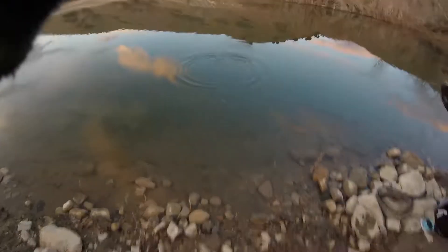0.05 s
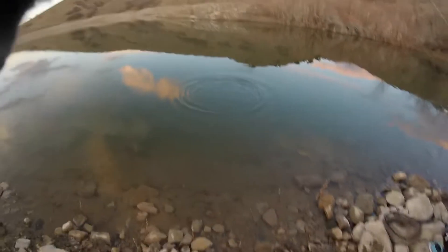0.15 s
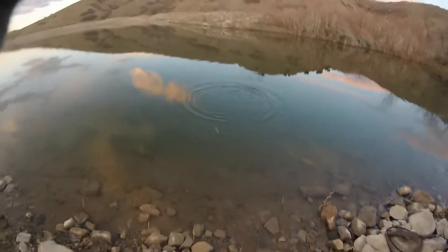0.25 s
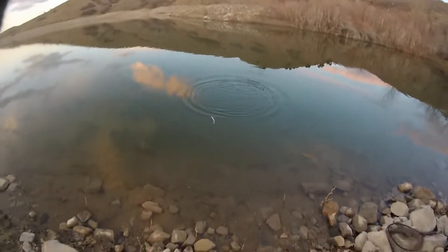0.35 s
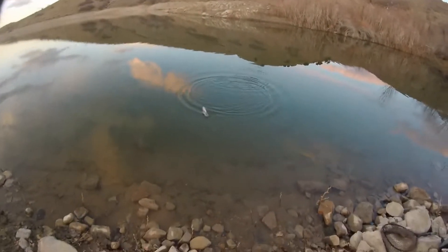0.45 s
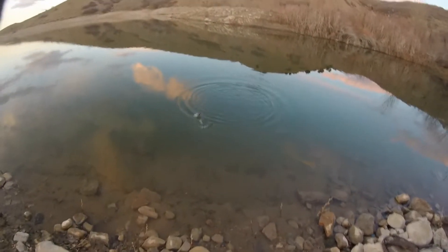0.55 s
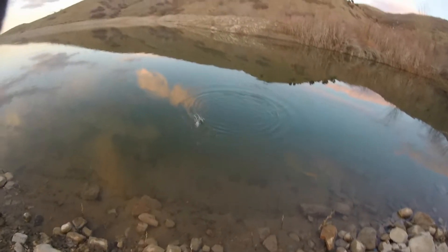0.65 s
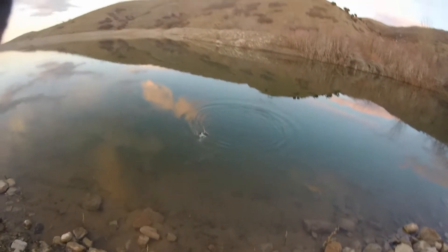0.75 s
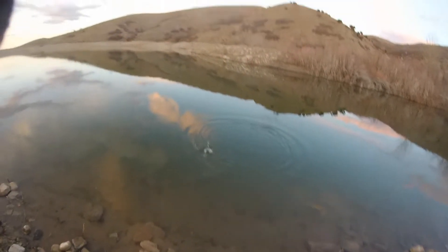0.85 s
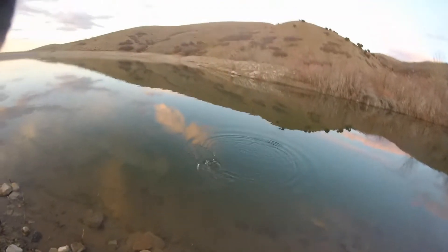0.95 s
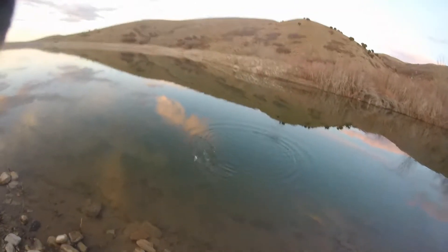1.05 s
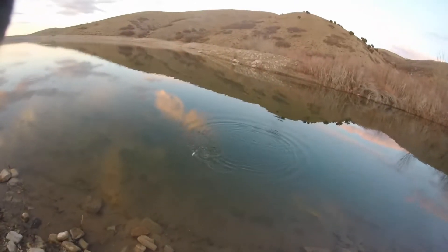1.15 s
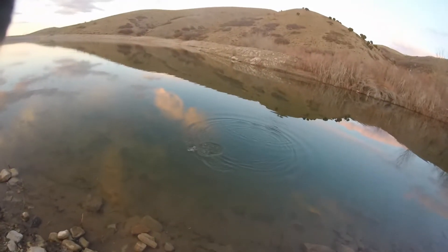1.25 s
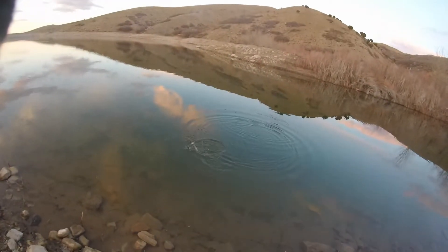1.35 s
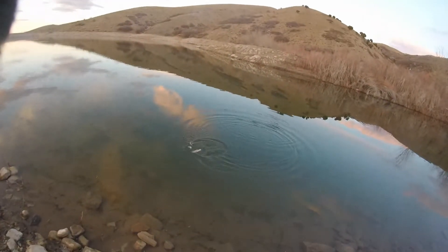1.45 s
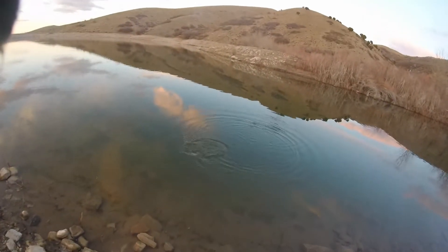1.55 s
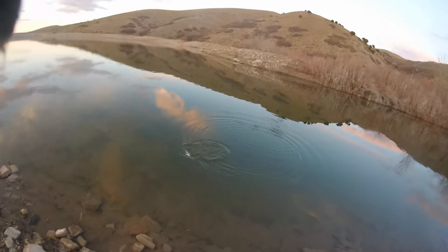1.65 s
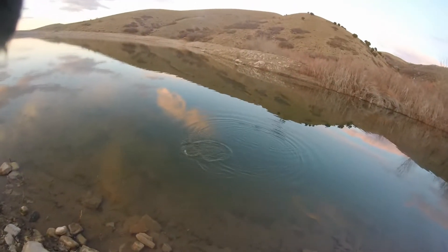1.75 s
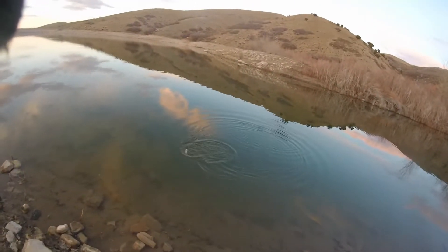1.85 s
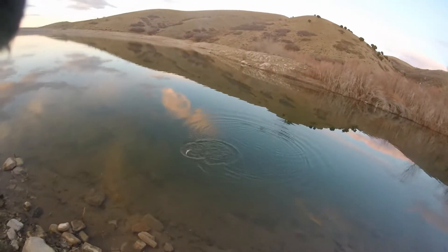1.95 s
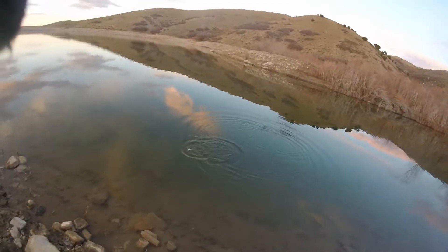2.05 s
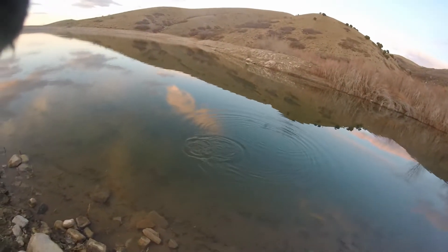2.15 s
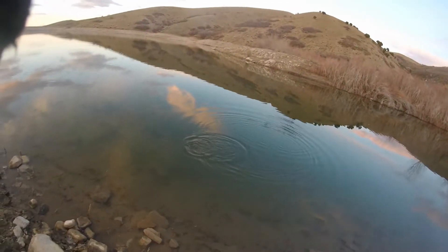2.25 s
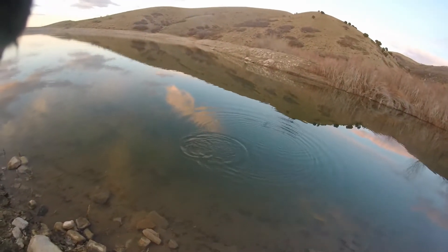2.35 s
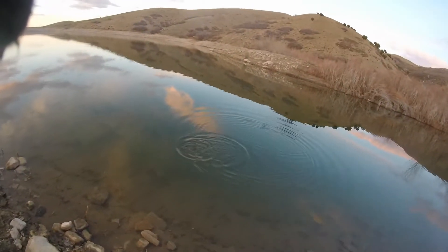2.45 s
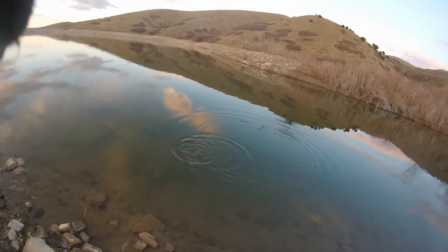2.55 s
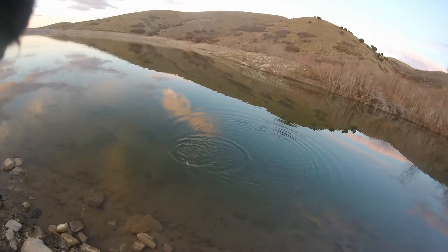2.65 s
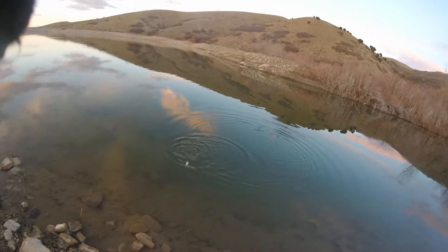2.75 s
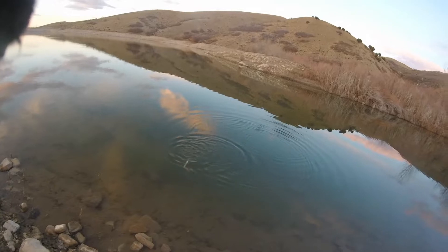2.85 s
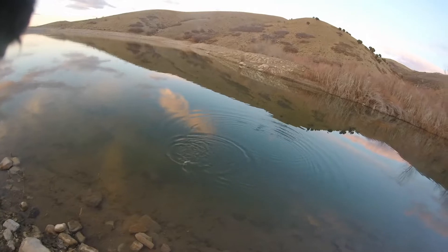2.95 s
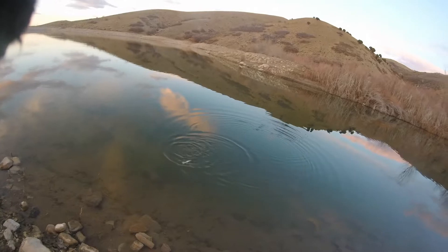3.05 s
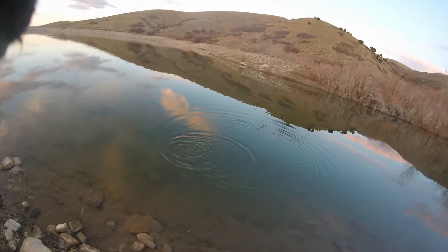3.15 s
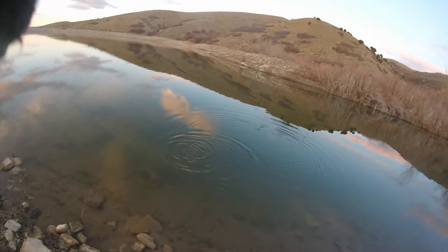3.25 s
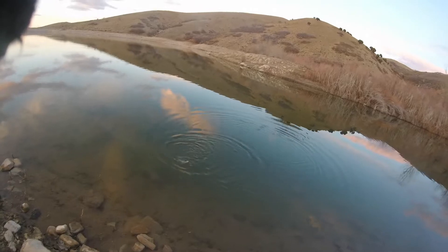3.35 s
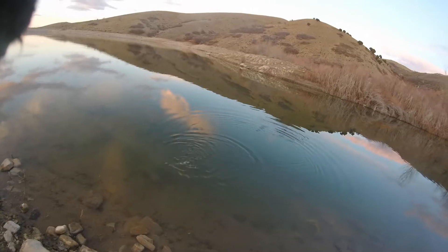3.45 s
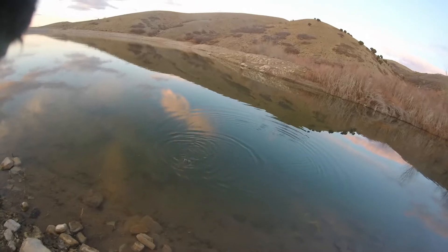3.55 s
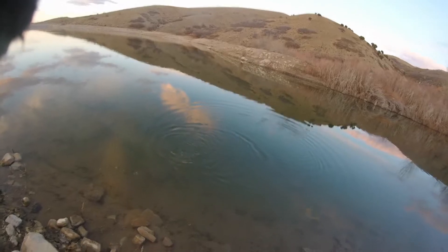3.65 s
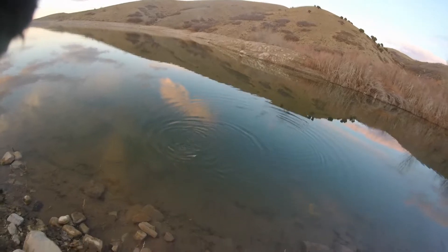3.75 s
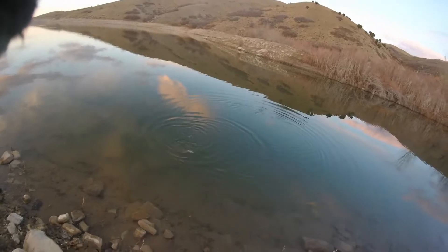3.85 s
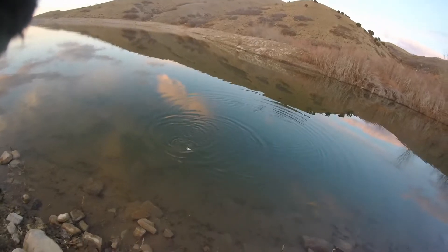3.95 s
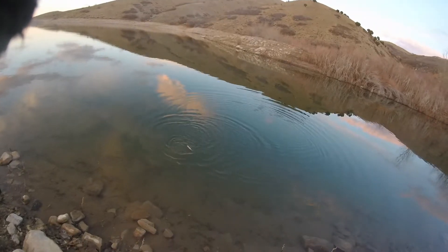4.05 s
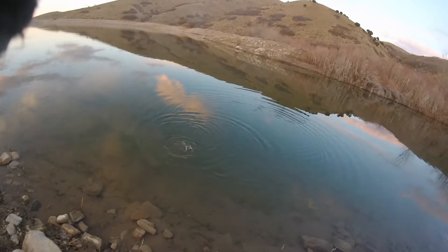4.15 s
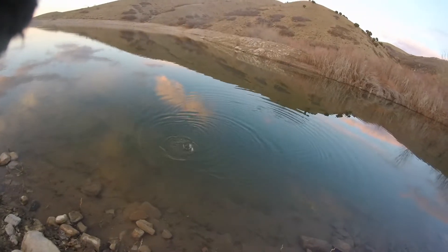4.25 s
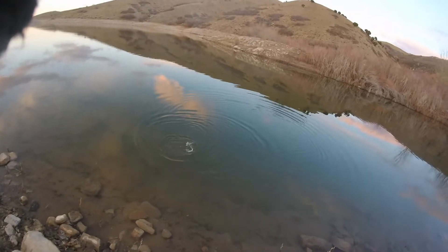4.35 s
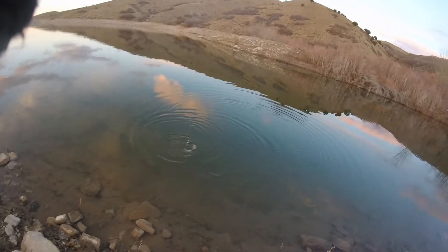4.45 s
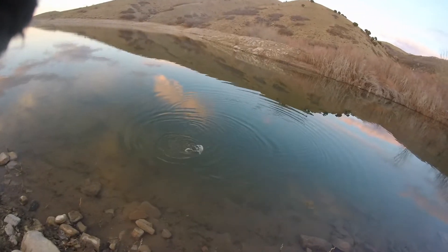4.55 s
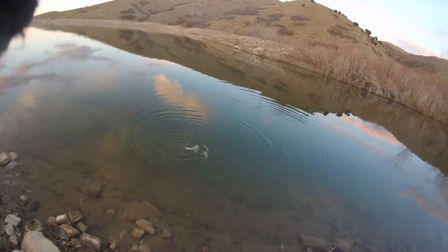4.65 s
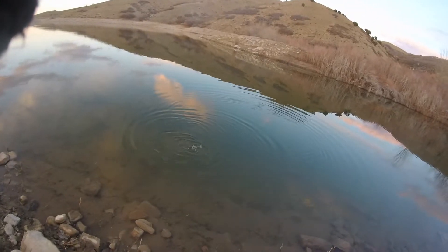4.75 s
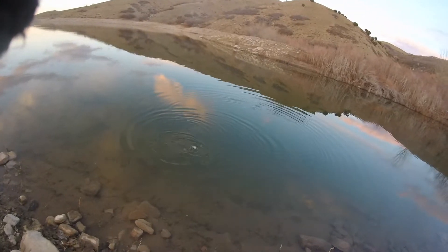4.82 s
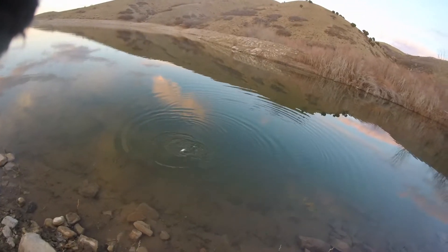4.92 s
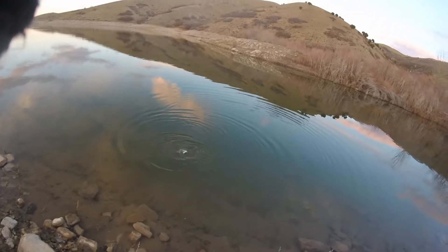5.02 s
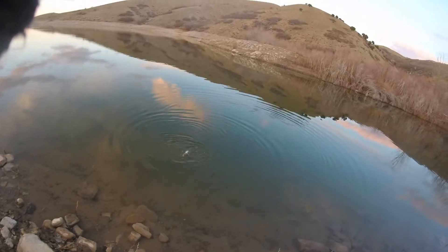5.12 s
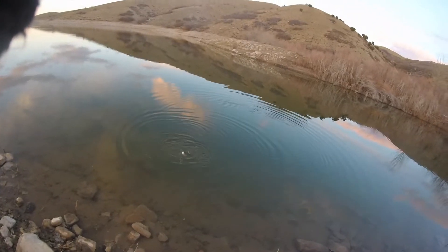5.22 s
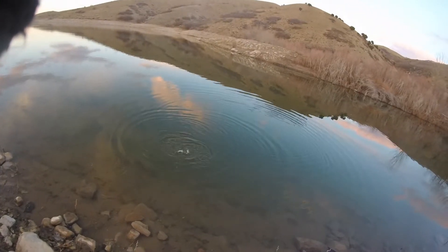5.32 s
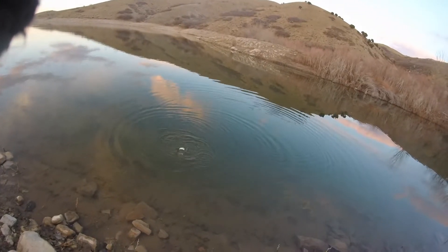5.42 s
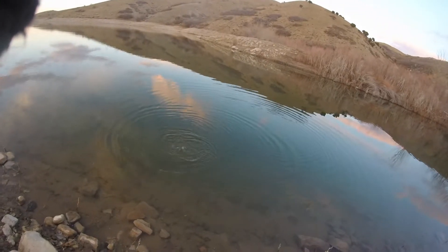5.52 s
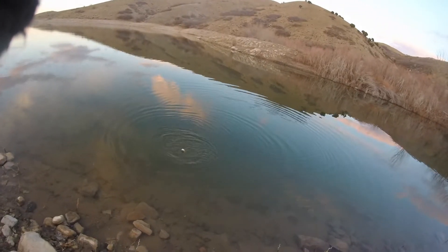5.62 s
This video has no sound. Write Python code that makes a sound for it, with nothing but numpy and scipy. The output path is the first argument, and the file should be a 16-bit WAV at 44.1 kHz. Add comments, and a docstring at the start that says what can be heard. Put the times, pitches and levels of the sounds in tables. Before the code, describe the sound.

A reel snaps and line swishes past up close, then a small rig plops, gulps and ticks in quiet still water.

```python
"""Rod and reel beside still water

Close by, a rod is swung at a reservoir's edge: the reel snaps, line and sleeve swish past, the reel clacks
three times. Out on the water a small rig flips about: bubbles plop and gulp, droplets tick.
Air and churned water are shaped noise and grains; metal and bubbles are dying sines; ticks ring a housing.
A quiet wide outdoor hush lies behind. One microphone feeds both channels.
"""
import sys
import numpy as np
from scipy import signal
from scipy.fft import rfft, irfft, next_fast_len
from scipy.io import wavfile
from scipy.ndimage import uniform_filter1d

SR = 44100
rng = np.random.default_rng(int(sys.argv[2]) if len(sys.argv) > 2 else 0)


def int16_out(signal):
    """Quantize to a 16-bit WAV file."""
    q = np.round(np.clip(np.atleast_2d(signal).T, -1, 1) * 32767)
    wavfile.write(sys.argv[1], SR, q.astype(np.int16))


N = 250563

# The swing, level before flutter: (time [s], bass swish [dB], middle swish [dB], high swish [dB])
SWING = [(0, -27, -23, -40), (.01, -29.5, -27.5, -46), (.021, -38, -36.5, -49), (.03, -41, -38.5, -43),
         (.05, -43, -38.5, -42), (.065, -46, -37, -38), (.094, -43.5, -36.5, -36.5), (.13, -42, -36, -38.5),
         (.162, -42.5, -35, -38.5), (.178, -48, -39, -43.5), (.2, -50, -43.5, -50), (.213, -40, -42.5, -51),
         (.235, -44.5, -42.5, -52.5), (.27, -46, -43.5, -49), (.3, -46, -40.5, -53.5),
         (.335, -45, -45, -53.5), (.36, -51, -45, -58), (.385, -71, -53, -67), (.42, -59, -65, -69),
         (.47, -66, -58.5, -69), (.6, -75, -59, -65), (.66, -70, -62, -71), (.75, -59, -82, -75),
         (.95, -70, -68, -92)]
# Topmost range of the swish, level before flutter: (time [s], level [dB])
SWING_TOP = [(0, -46), (.012, -48), (.025, -56), (.066, -58), (.1, -53), (.14, -50), (.17, -54), (.19, -60),
             (.23, -63), (.28, -66), (.33, -69), (.37, -76), (.42, -82), (.5, -88)]
# Colour of the torn air: (frequency [Hz], relative density [dB per Hz])
SWISH_SPECTRUM = [(70, -13), (200, -11.5), (330, -15), (520, -8.5), (700, -3.5), (1100, -9), (1430, -3.5),
                  (1680, -6.5), (1930, -3), (2200, -9.5), (2450, -15), (2900, -19), (3300, -13),
                  (3620, -11), (4200, -10), (5300, -8), (7100, -14), (7700, -11.5), (8600, -20.5),
                  (10500, -25), (10950, -24), (11400, -13), (15200, -30)]
BASS_SPLIT_HZ, HIGH_SPLIT_HZ, TOP_SPLIT_HZ = 1100, 3400, 9700
WHIRLS_PER_S, WHIRL_SHARE, WHIRL_CYCLES = 430, 0.51, 14  # gurgling grain of the low swish
SPRAY_PER_S, SPRAY_SHARE = 830, 0.2  # crackling grain of the high swish

# The bail wire snaps over and bounces: (time [s], level of the ring [dB])
BAIL_SNAPS = [(0.0051, -12.5), (0.0074, -20), (.0152, -28)]
# Modes of the bail wire: (frequency [Hz], relative level [dB], t60 [s])
BAIL_MODES = [(1440, -0.5, 0.013), (2700, -10, 0.0058), (3250, 3.5, 0.0034), (4800, -4, 0.0067),
              (7850, -5, 0.002)]

# Blows on the reel: (time [s], peak of the ring [dB], hardness [dB per octave])
REEL_BLOWS = [(1.0172, -45, 3), (1.0199, -28, -1.5), (1.0445, -28.5, 0.7), (1.0766, -30.5, 1.5),
              (1.0847, -37, -2)]
# Modes of the reel, before chance detuning: (frequency [Hz], relative level [dB], t60 [s])
REEL_MODES = [(298, -6, 0.026), (594, 2, 0.042), (410, 1, 0.011), (527, 8, 0.026), (748, 1.5, 0.13),
              (910, -6, 0.11), (1160, 0, 0.027), (1376, 5, 0.032), (1935, -5, 0.031), (2150, -11, 0.045),
              (3080, 2, 0.0085), (5100, -25, .012), (7600, -20, 0.0072)]
REEL_LOOSENESS = 0.025  # spread of each mode's shift from blow to blow, as a share
CRACK_DB = -9  # crack against the ring
THUD_HZ, THUD_WIDTH_HZ, THUD_DB, THUD_T60_S = 560, 380, -15, 0.09  # loose parts rattling low
# The spool rubs and sings around the clacks: (time [s], rms level [dB])
SPOOL_RUB = [(0.947, -73), (.957, -48), (.97, -57), (.983, -49), (.996, -46), (1.001, -59), (1.012, -51),
             (1.058, -57), (1.068, -41), (1.074, -58), (1.08, -44), (1.093, -50), (1.1, -72)]
RUB_HZ, RUB_WIDTH_HZ = 915, 45
RUB_ROUGH, RUB_WAVER_HZ = 1, 25.2  # noise beside the tone; unsteadiness of its pitch

# Bubbles: (time [s], approximate peak [dB], middle of the pitch rise [Hz], t60 [s])
PLOPS = [(0.2209, -24.5, 670, 0.0055), (0.2875, -36, 1840, .008), (0.2899, -27, 785, 0.0092),
         (0.292, -29, 1580, .008), (0.379, -26.5, 764, 0.0041), (0.397, -30, 810, 0.0058),
         (0.412, -34, 880, 0.017), (0.42, -36, 920, 0.014), (0.43, -37, 940, 0.023),
         (0.4783, -31.5, 694, 0.012), (0.494, -32, 746, 0.0037), (0.4976, -32, 804, 0.006),
         (0.5124, -35, 830, 0.015), (0.526, -45, 2020, 0.0046), (0.5417, -41, 910, 0.012),
         (0.5458, -38.5, 5200, 0.0047), (0.55, -46, 2930, 0.02), (0.561, -37.5, 1020, 0.0096),
         (0.553, -42, 1590, 0.0077), (0.5937, -44, 1010, 0.045), (0.6108, -43, 855, 0.011),
         (0.634, -36.5, 1440, 0.025), (0.671, -45, 1230, 0.021), (0.6777, -45, 4650, 0.018),
         (0.6781, -36, 875, 0.027), (0.69, -45, 810, .014), (0.7162, -37.5, 1068, 0.01),
         (0.728, -48, 1280, 0.06), (0.744, -37, 1280, 0.0088), (0.748, -41.5, 1250, 0.016),
         (0.78, -44, 1210, 0.011), (0.904, -51, 1968, 0.0073), (1.169, -45.5, 900, 0.031),
         (1.178, -46, 817, 0.0075), (1.229, -50, 720, .01), (1.238, -48, 780, 0.014),
         (1.274, -45, 1760, 0.006), (1.277, -48, 2470, .012), (1.3395, -49, 805, .008),
         (1.3426, -45.5, 2280, 0.011), (1.351, -51, 2230, 0.013), (1.369, -51, 2400, .01),
         (1.382, -44, 2340, 0.02), (1.395, -51, 2270, 0.023), (1.4273, -43, 2100, 0.0065),
         (1.4948, -43.5, 710, 0.012), (1.517, -52, 1950, 0.0069), (3.3861, -52, 1380, .02),
         (3.408, -44, 1854, 0.0068), (3.421, -49, 3320, 0.0071), (3.432, -58, 4800, .025),
         (3.4432, -50, 2100, .013), (3.4977, -52, 2437, .005), (3.521, -42.5, 750, 0.019),
         (4.1485, -46.5, 1400, 0.013), (4.1567, -44.5, 2970, 0.0098), (4.2062, -44, 2750, 0.0067),
         (4.206, -41, 905, 0.0081), (4.225, -52, 1750, .012), (4.276, -48, 1420, 0.011),
         (4.2878, -35.5, 2050, 0.0064), (4.2905, -44, 950, .012), (4.291, -42, 2000, .008),
         (4.313, -52, 3020, .008), (4.353, -52, 1500, .012), (4.474, -35.5, 1070, 0.025),
         (4.494, -32.5, 1310, 0.01), (4.5, -43.5, 1780, 0.019), (4.523, -42.5, 1200, 0.017),
         (4.528, -48.5, 445, 0.064), (4.5732, -40, 2520, 0.0062), (4.6635, -50, 2928, .004),
         (4.6937, -33, 6890, 0.013), (4.694, -58, 13100, 0.026), (4.7164, -41.5, 790, 0.011),
         (4.7266, -36, 780, 0.024), (4.733, -52, 2900, .008), (4.746, -52, 3030, .01),
         (4.738, -57, 4500, .02), (4.7482, -45, 2250, 0.003), (4.7756, -38.5, 1060, 0.004),
         (4.8153, -42.5, 1630, 0.016), (4.8213, -42, 386, 0.039), (5.2522, -36.5, 1760, 0.012),
         (5.2602, -27.5, 2630, 0.0019), (5.3691, -44, 1300, 0.018), (5.37, -45, 3020, 0.019),
         (5.378, -43, 1290, 0.0099), (5.392, -54, 3080, .025)]
PLOP_ATTACK_S, ATTACK_BY_SIZE = 0.0013, 0.77  # 1 kHz bubble of 12 cycles; power of bubble size
ATTACK_BY_RING = 0.58  # bubbles that ring more cycles also swell more slowly, by this power
PLOP_RISE_OCTAVES, PLOP_SPLASH = 0.15, 0.073  # at 1 kHz; both shrink for small, high bubbles
LANDING_SPLASH, LANDING_S = 3, 0.74  # extra splash just after the landing; its time constant
BLIP = 2000  # samples in the longest bubble
# Air pockets closing while they rise or sink: (time [s], length [s], start pitch [Hz], end pitch [Hz],
# level before wetness [dB], power of the pitch glide [1], share of length spent swelling [1])
GULPS = [(.556, .014, 1600, 950, -47, 1.1, .3), (0.732, 0.034, 369, 417, -47, 1.2, 0.66),
         (1.168, 0.0154, 1450, 2050, -56, 1.1, .3), (1.327, .008, 900, 1300, -50, 1.1, .4),
         (1.3442, 0.013, 1090, 1870, -41.5, 1.34, 0.32), (1.387, 0.0099, 890, 1260, -48, 1.1, .3),
         (1.429, .007, 1750, 2150, -53, 1.2, .3), (2.0882, .012, 1310, 1020, -44, 1.3, .08),
         (2.108, 0.023, 708, 1700, -43, 2.24, 0.12), (3.406, 0.009, 665, 676, -46, 1.1, .3),
         (3.418, 0.0126, 677, 697, -39, 0.97, .55), (4.4124, 0.034, 601, 850, -44, 1.03, .06),
         (4.425, 0.014, 750, 1970, -40.5, 1.06, 0.81), (4.595, 0.015, 680, 2170, -51.5, 0.94, 1)]
GULP_ONSET, GULP_SAG = 0.79, 0.42  # strength 0-1 at the start and just before the end
GULP_WOBBLE, GULP_WET = 0.05, 0.2  # unsteadiness of pitch and of strength, as shares
# Small splashing between the plops, before each user's share: (time [s], density [bubbles per s])
STIR = [(0, 150), (.5, 330), (1.0, 70), (1.5, 70), (1.8, 15), (2.4, 5), (3.2, 3), (3.45, 60), (3.7, 3),
        (4.05, 5), (4.3, 90), (4.8, 100), (5.3, 70), (5.68, 15)]
STIR_DB, STIR_SPREAD_DB = -57.5, 10  # smallest draw at the lowest pitch; range of chance above it

# Swarms of tiny bubbles: (time [s], length [s], centre frequency [Hz], rms level over length [dB])
SPATTER = [(0.371, 0.026, 897, -49), (0.438, 0.015, 1180, -46.5), (0.537, 0.027, 1860, -51),
           (0.57, 0.032, 2360, -66), (0.583, 0.027, 1600, -54), (0.694, 0.042, 1300, -62),
           (0.628, 0.022, 1440, -48.5), (0.658, 0.067, 1100, -66), (0.739, 0.017, 1540, -57),
           (0.765, .013, 1370, -56), (0.905, 0.015, 1370, -51.5), (1.167, 0.024, 1000, -65),
           (1.23, 0.013, 1710, -66), (1.335, 0.02, 1410, -52.5), (3.408, 0.012, 1500, -56.5),
           (3.431, 0.019, 1100, -55), (3.484, 0.049, 785, -58.5), (4.294, 0.018, 803, -58),
           (4.47, 0.021, 1660, -66), (4.572, 0.0085, 2700, -56), (4.846, 0.01, 2880, -60),
           (5.013, 0.011, 2870, -56), (5.259, 0.011, 2400, -51.5), (5.352, 0.0063, 2300, -55),
           (5.368, 0.018, 2060, -52.5)]
SPATTER_SPREAD_OCTAVES = 0.59
# Droplets slapping the surface, broad and very short: (time [s], peak [dB], centre frequency [Hz])
SLAPS = [(.1615, -27, 1900), (.212, -32, 1900), (.2268, -30, 1300), (.2465, -36, 1600), (.2755, -34, 1200),
         (.2888, -31, 3000), (.319, -35, 2200), (.3973, -43, 2200), (0.413, -44, 2000), (.4308, -41, 1900),
         (.4485, -52, 2300), (.4787, -44, 1900), (.4985, -41, 2200), (.5425, -44, 2600), (.5525, -48, 1700),
         (.596, -52, 2800), (0.645, -46, 2000), (.7165, -52, 1500), (.743, -36.5, 1700),
         (0.7498, -40.5, 2100), (0.7538, -42, 1600), (1.346, -45, 1600), (1.381, -49, 2000),
         (2.089, -50, 2500), (2.2142, -49, 3000), (3.4073, -50, 1300), (3.4325, -47, 1400),
         (4.415, -51, 2600), (4.475, -55, 1600), (4.691, -48, 1900), (4.717, -50, 1500), (4.777, -53, 1300),
         (5.3495, -50, 2600), (5.3685, -49, 2000), (5.376, -46, 1600)]
SLAP_T60_S, SLAP_WIDTH = 0.0055, 0.9  # width as a share of the centre frequency
# Churned water around the splashes: (time [s], rms level [dB])
WASH = [(0, -47), (.1, -46), (.2, -51.5), (.3, -52), (.37, -58), (.45, -62), (.47, -68), (.55, -57),
        (.65, -60.5), (.75, -66), (.85, -73), (1.0, -62), (1.4, -72), (1.6, -79), (2.06, -76), (2.11, -62),
        (2.25, -77), (3.36, -73), (3.43, -63), (3.53, -64), (3.62, -73), (4.1, -83), (4.2, -66),
        (4.45, -66), (4.6, -67.5), (4.75, -61), (4.9, -69), (5.3, -66), (5.5, -80)]
WASH_PER_S, WASH_CYCLES, WASH_TILT_DB = 1200, 7.3, -3  # typical grain rate; level per octave

# Droplet and line ticks: (time [s], loudest 1 ms rms [dB], centre frequency [Hz], t60 of the puff [s])
TICKS = [(0.207, -46, 11100, 0.016), (0.288, -46, 11300, 0.0093), (0.289, -43, 7000, .005),
         (0.363, -40, 7000, 0.0051), (0.385, -49, 5000, 0.017), (0.4305, -51, 5300, 0.014),
         (0.449, -52, 7934, .009), (0.478, -43, 4500, 0.0073), (0.498, -56, 5197, 0.014),
         (0.5195, -55.5, 10700, 0.03), (0.5458, -66, 6050, .015), (0.5799, -60, 7843, .048),
         (0.633, -57, 8700, 0.042), (0.6783, -53, 5130, .023), (0.7057, -54.5, 6500, .046),
         (0.7134, -67, 10018, .025), (0.7336, -55, 6300, 0.051), (0.7473, -55.5, 8700, 0.034),
         (0.779, -59, 9195, 0.015), (0.9037, -58, 6800, 0.031), (1.164, -50, 6750, 0.0082),
         (1.2296, -59, 4553, .01), (1.2737, -50, 7850, 0.016), (1.3494, -60, 7440, 0.042),
         (1.386, -59, 5500, 0.059), (1.433, -58.5, 6740, 0.013), (1.5188, -58, 5578, 0.009),
         (1.5622, -53.5, 7700, 0.011), (2.108, -60, 4792, 0.011), (2.213, -61, 5900, 0.0085),
         (3.298, -57, 9550, 0.0018), (3.3335, -57, 5100, 0.016), (3.4207, -56, 4530, .025),
         (4.122, -57, 8250, 0.03), (4.157, -56, 4907, 0.029), (4.2062, -56, 7851, 0.035),
         (4.295, -58, 9285, 0.017), (4.3248, -58, 5600, 0.025), (4.399, -65, 7600, .014),
         (4.415, -57.5, 4800, .035), (4.432, -58, 6300, .019), (4.553, -67, 6200, .012),
         (4.572, -61, 7596, 0.028), (4.5864, -59, 8754, .018), (4.6459, -64, 10000, .02),
         (4.6946, -57, 7140, 0.046), (4.693, -55, 13200, 0.011), (4.731, -62, 8450, .042),
         (4.802, -69, 6800, .025), (4.821, -59, 8219, .023), (4.906, -57, 6200, 0.014),
         (4.9932, -58, 5738, .016), (5.0182, -50, 10000, 0.033), (5.0844, -62, 9205, 0.013),
         (5.133, -65, 9000, .014), (5.1702, -57, 9200, 0.061), (5.1778, -54.5, 7950, 0.018),
         (5.253, -51.5, 11600, 0.012), (5.2614, -50, 8500, 0.022), (5.3683, -52.5, 7040, .025),
         (5.378, -66, 11500, .014), (5.426, -61, 8100, .014), (5.4519, -61, 7400, .024),
         (5.4954, -62, 8218, .016)]
# Housing a tick rings in: (frequency [Hz], nominal width, widened in use [Hz], relative level [dB])
HOUSING = [(3550, 1400, 37), (4650, 480, 26), (6090, 2500, 2.5), (7700, 1000, -10.5), (8780, 220, -10),
           (11100, 370, -19.5), (13700, 1500, -20.5)]
TICK_SPREAD_OCTAVES = 0.27
PATTER_CALM_PER_S = 30  # no patter while fewer bubbles come
PATTER_SHARE, PATTER_DB, PATTER_T60_S = 0.1, -68, 0.018  # level is that of the faintest draw

# Colour of the hush: (frequency [Hz], relative density [dB per Hz])
HUSH_SPECTRUM = [(12, -19), (25, 0.5), (62, 2.5), (85, 0.5), (120, 1.5), (175, -1.5), (240, 0.5), (390, -4),
                 (690, -5.5), (1080, -12.5), (1780, -12.5), (2760, -18.5), (4800, -24), (9600, -31.5),
                 (15200, -42.5)]
# The hush swells a little: (time [s], lift above HUSH_DB [dB])
HUSH_SWELL = [(0, 2.5), (.8, 3), (1.5, 1.6), (2.2, 1.94), (3.5, 1.33), (5, 1.9), (5.68, 1.5)]
HUSH_DB = -57
# Faint fizz of bursting foam, before its flicker: (time [s], rms level [dB])
FIZZ = [(0, -87), (1.9, -89), (2.12, -75.5), (2.35, -86), (2.6, -100), (4.4, -89), (4.58, -79), (4.67, -73),
        (4.75, -86), (4.9, -78), (5.68, -95)]
FIZZ_HZ, FIZZ_WIDTH_HZ = 10000, 13000
CUTOFF_HZ = 15600


def swish():
    """Air torn by rod and line: fluttering noise in four ranges, gurgling below, crackling above."""
    bass_db, middle_db, high_db = in_time(SWING, after=-120)
    top_db, = in_time(SWING_TOP, after=-120)
    air = coloured(SWISH_SPECTRUM)
    low = rms_one(split(air, 4, HIGH_SPLIT_HZ, "low")) + WHIRL_SHARE * rms_one(whirls())
    bass = split(low, 3, BASS_SPLIT_HZ, "low")
    middle = split(low, 3, BASS_SPLIT_HZ, "high")
    spray = rng.exponential(1, N) * (rng.random(N) < SPRAY_PER_S / SR)
    crackle = rms_one(uniform_filter1d(spray, size=12))
    bright = split(air * (1 + SPRAY_SHARE * crackle), 4, HIGH_SPLIT_HZ, "high")
    top = split(bright, 4, TOP_SPLIT_HZ, "high")
    high = split(bright, 4, TOP_SPLIT_HZ, "low")
    flutter_db = 0.89 * drift(340)  # shared by bass and middle
    out = rms_one(bass) * from_db(bass_db + 1.0 * drift(36) + flutter_db)
    out += rms_one(middle) * from_db(middle_db + 0.34 * drift(60) + flutter_db)
    out += rms_one(high) * from_db(high_db + 0.55 * drift(90))
    return out + rms_one(top) * from_db(top_db + 0.6 * drift(70))


def whirls():
    """Uneven short rings scattered over the low swish's pitches give it a gurgling grain."""
    kicks = random_kicks(1.4, WHIRLS_PER_S)
    dealt = rng.integers(0, 12, N)  # the pitch each kick falls to
    spectrum_hz, spectrum_db = np.transpose(SWISH_SPECTRUM)
    out = np.zeros(N)
    for k, hz in enumerate(np.geomspace(520, 2300, num=12)):
        ring = resonate(kicks * (dealt == k) + 1e-18, hz, 1.8 * hz / WHIRL_CYCLES)
        out += from_db(np.interp(hz, spectrum_hz, spectrum_db)) * resonate(ring, hz, hz / 2)
    return out


def bail():
    """Each snap rings the short bright modes of the wire."""
    out = np.zeros(N)
    for s, snap_db in BAIL_SNAPS:
        for hz, mode_db, t60 in BAIL_MODES:
            add(out, s, from_db(snap_db + mode_db) * bubble(hz, t60, rise=0, attack=0.0002))
    return out


def reel():
    """Each blow cracks, thuds and rings every mode by chance strength; hard blows favour high modes."""
    out, t = np.zeros(N), np.arange(int(0.1 * SR)) / SR
    hz, mode_db, t60 = np.transpose(REEL_MODES)[:, :, None]
    chance = rng.normal(0, 1, (len(REEL_BLOWS), len(REEL_MODES), 1))
    detune = 1 + REEL_LOOSENESS * rng.normal(0, 1, chance.shape)
    noises = rng.standard_normal((len(REEL_BLOWS), len(t)))
    for (s, peak_db, tilt_db), spread, loose, noise in zip(REEL_BLOWS, chance, detune, noises):
        strength_db = mode_db + tilt_db * np.log2(hz / 1000) + 2.0 * spread
        modes = from_db(strength_db - 60 * t / t60) * np.sin(2 * np.pi * hz * loose * t)
        rings = np.sum(modes, axis=0) * (1 - np.exp(-t / 0.00088))  # the contact is not instant
        rings /= np.abs(rings).max()
        closing = from_db(-1500 * np.maximum(t - 0.014, 0))  # parts close up again and damp the ring
        crack = resonate(resonate(resonate(noise, 5200, 8600), 7600, 10000), 5500, 9000)
        crack *= from_db(CRACK_DB - 60 * t / 0.011)
        rattle = resonate(resonate(noise[::-1], THUD_HZ, THUD_WIDTH_HZ), THUD_HZ, 2 * THUD_WIDTH_HZ)
        thud = rms_one(rattle) * from_db(THUD_DB - 60 * t / THUD_T60_S) * (1 - np.exp(-t / 0.0011))
        add(out, s, from_db(peak_db) * (closing * (rings + thud) + crack))
    return out + spool_rub()


def spool_rub():
    """Rubbing sings an unsteady tone, with noise through its resonance and a fainter upper mode."""
    noise = resonate(rng.standard_normal(N), 830, 1600)
    sung = resonate(noise, RUB_HZ, RUB_WIDTH_HZ) + from_db(-13.5) * resonate(noise, 2140, 98)
    tone = np.sin(2 * np.pi * np.cumsum(RUB_HZ + RUB_WAVER_HZ * drift(47)) / SR)
    level_db, = in_time([(0, -120), *SPOOL_RUB], after=-120)
    return rms_one(tone + RUB_ROUGH * rms_one(sung)) * from_db(level_db)


def water():
    """Out on the water: plops, gulps, and a random scatter of small bubbles."""
    return plops() + gulps() + stirring()


def plops():
    """Each bubble rings at a rising pitch with a little splash; larger ones swell more slowly."""
    out = np.zeros(N)
    for (s, peak_db, hz, t60), noise in zip(PLOPS, rng.standard_normal((len(PLOPS), BLIP))):
        size = 1000 / hz
        splash = rms_one(resonate(resonate(noise, 1.9 * hz, 0.74 * hz), 1.7 * hz, 2.0 * hz))
        splash *= PLOP_SPLASH * size * (1 + LANDING_SPLASH * np.exp(-s / LANDING_S))
        attack = PLOP_ATTACK_S * size ** ATTACK_BY_SIZE * (hz * t60 / 12) ** ATTACK_BY_RING
        add(out, s, from_db(peak_db) * bubble(hz, t60, PLOP_RISE_OCTAVES * size, attack, splash))
    return out


def gulps():
    """A closing air pocket is a gliding, wobbling sine that swells and then sags."""
    out, wobble, wet = np.zeros(N), drift(160), drift(280)
    for s, length, start_hz, end_hz, peak_db, lateness, swelling in GULPS:
        u = np.linspace(0, 1, int(length * SR))
        now = slice(int(s * SR), int(s * SR) + len(u))
        hz = (1 + GULP_WOBBLE * wobble[now]) * start_hz * (end_hz / start_hz) ** (u ** lateness)
        swell = np.interp(u, [0, np.clip(swelling, 0.05, 0.95), 1], [GULP_ONSET, 1, GULP_SAG])
        swell *= np.minimum(1, 43.0 * u) * np.minimum(1, 33.0 * (1 - u))  # soft ends
        tone = np.sin(2 * np.pi * np.cumsum(hz) / SR)
        add(out, s, from_db(peak_db) * (1 + GULP_WET * wet[now]) * swell * tone)
    return out


def stirring():
    """Small bubbles at chance moments; higher ones are fainter and die sooner."""
    out = np.zeros(N)
    for s, pitch, size in stirred(count=2000, share=0.97):
        hz = 450 * 2 ** (2.6 * pitch)
        level_db = STIR_DB + STIR_SPREAD_DB * size - 8.0 * pitch
        add(out, s, from_db(level_db) * bubble(hz, 14.7 / hz, rise=0.34, attack=0.00046))
    return out


def spatter():
    """Each swarm is a handful of bubbles of mixed size, thickest early on."""
    out = np.zeros(N)
    when, pitch = rng.random((len(SPATTER), 14)), rng.standard_normal((len(SPATTER), 14))
    for (s, length, centre_hz, level_db), delays, octaves in zip(SPATTER, when, pitch):
        swarm = np.zeros(int((length + 0.06) * SR))
        pitches_hz = centre_hz * 2 ** (SPATTER_SPREAD_OCTAVES * np.clip(octaves, -2, 2))
        for delay, hz in zip(delays, pitches_hz):
            strength = (hz / centre_hz) ** -0.6
            add(swarm, length * delay ** 1.3, strength * bubble(hz, 21.0 / hz, rise=0.31, attack=0.00096))
        add(out, s, from_db(level_db) * swarm / np.sqrt(np.sum(swarm ** 2) / (length * SR)))
    return out


def slaps():
    """Each slap on the surface is a noise puff through two wide resonances on one pitch."""
    out, t = np.zeros(N), np.arange(500) / SR
    for (s, peak_db, hz), noise in zip(SLAPS, rng.standard_normal((len(SLAPS), len(t)))):
        puff = noise * from_db(-60 * t / SLAP_T60_S)
        slap = resonate(resonate(puff, hz, SLAP_WIDTH * hz), hz, 2 * hz)
        add(out, s, from_db(peak_db) * slap / np.abs(slap).max())
    return out


def wash():
    """Churned water: dense tiny bubbles of a few cycles each, coming in clumps."""
    kicks = random_kicks(3.1, WASH_PER_S * from_db(3.0 * drift(25)))
    dealt = rng.integers(0, 14, N)  # the pitch each kick falls to
    grains = np.zeros(N)
    for k, hz in enumerate(np.geomspace(480, 5000, num=14)):
        ring = resonate(resonate(kicks * (dealt == k) + 1e-18, hz, hz / WASH_CYCLES), hz, hz / 2)
        grains += from_db(WASH_TILT_DB * np.log2(hz / 1000)) * rms_one(ring)
    return rms_one(grains) * from_db(in_time(WASH, after=-120)[0])


def ticks():
    """Short noise puffs ring the housing modes near their centre pitch; a faint patter falls between."""
    out, t = np.zeros(N), np.arange(int(0.05 * SR)) / SR
    patter = [(s, PATTER_DB + 9.1 * size, 4500 * 2 ** (1.2 * pitch), PATTER_T60_S)
              for s, pitch, size in stirred(count=400, share=PATTER_SHARE, calm=PATTER_CALM_PER_S)]
    hits = TICKS + patter
    for (s, level_db, centre_hz, t60), noise in zip(hits, rng.standard_normal((len(hits), len(t)))):
        puff = noise * from_db(-60 * t / t60)
        tick = np.zeros(len(t))
        for hz, width_hz, mode_db in HOUSING:
            nearness = np.exp(-0.5 * (np.log2(hz / centre_hz) / TICK_SPREAD_OCTAVES) ** 2)
            ring = resonate(resonate(puff, hz, 1.7 * width_hz), hz, 1.7 * width_hz)
            tick += from_db(mode_db) * nearness * ring
        loudest = np.sqrt(uniform_filter1d(tick ** 2, size=44).max())
        add(out, s, from_db(level_db) * tick / loudest)
    return out


def hush():
    """Far wind, water and the microphone's own hiss as shaped noise, with a faint bright fizz at times."""
    noise = rng.standard_normal(N)
    fizz = rms_one(resonate(resonate(noise, FIZZ_HZ, FIZZ_WIDTH_HZ), FIZZ_HZ, FIZZ_WIDTH_HZ))
    distance = coloured(HUSH_SPECTRUM) * from_db(HUSH_DB + in_time(HUSH_SWELL)[0] + 0.78 * drift(11.0))
    return distance + fizz * from_db(in_time(FIZZ)[0] + 2.3 * drift(60))


def bubble(hz, t60, rise, attack, splash=0):
    """A dying sine climbing `rise` octaves, as a bubble nearing the surface; splash dies with it."""
    t = np.arange(BLIP) / SR
    attack = max(attack, 2e-4)
    climb = np.minimum(t / (attack + 0.25 * t60), 1) - 0.5
    phase = 2 * np.pi * np.cumsum(hz * 2 ** (rise * climb)) / SR
    shape = np.sin(np.pi / 2 * np.minimum(t / attack, 1))
    shape *= from_db(-60 * np.maximum(t - attack, 0) / t60)
    return shape * np.sin(phase) + splash * shape ** 0.67


def stirred(count, share, calm=0):
    """Chance moments, as dense as a share of the stirring above `calm`, each with two draws of 0-1."""
    draws, per_s = rng.random((count, 4)), in_time(STIR)[0]
    moments = []
    for when, keep, a, b in draws:
        if keep * count * SR / N < share * (per_s[int(when * N)] - calm):
            moments.append((when * N / SR, a, b))
    return moments


def random_kicks(spread_db, per_s):
    """Single-sample kicks of either sign and uneven strength, at chance moments."""
    strength = from_db(spread_db * np.minimum(rng.exponential(1, N), 4))
    return strength * rng.choice([-1, 1], N) * (rng.random(N) < per_s / SR)


def resonate(x, hz, width_hz):
    """One two-pole resonance, gain about 1 on top."""
    r = np.exp(-np.pi * width_hz / SR)
    poles = [1, -2 * r * np.cos(2 * np.pi * hz / SR), r * r]
    return signal.lfilter([(1 - r * r) / 2, 0, (r * r - 1) / 2], poles, x)


def split(x, order, hz, side):
    """Keep the low or high side of a split frequency."""
    return signal.sosfilt(signal.butter(order, hz, side, fs=SR, output="sos"), x)


def coloured(spectrum):
    """Noise shaped to a (frequency [Hz], level [dB]) table; rms 1."""
    hz, level_db = np.transpose(spectrum)
    size = next_fast_len(N)
    log_hz = np.log(np.maximum(np.arange(size // 2 + 1) * SR / size, 1))
    shape = from_db(np.interp(log_hz, np.log(hz), level_db))
    return rms_one(irfft(rfft(rng.standard_normal(size)) * shape, size)[:N])


def drift(rate):
    """Smoothed chance wandering, rms 1; a higher rate [Hz] wanders faster."""
    r = np.exp(-2 * np.pi * rate / SR)
    noise = rng.standard_normal(N + SR)  # the first second settles the filter
    return rms_one(signal.lfilter([1], [1, -2 * r, r * r], noise)[SR:])


def in_time(rows, after=None):
    """Columns of a curve at every sample; `after` holds beyond its end."""
    s, *columns = np.transpose(rows)
    return [np.interp(np.arange(N) / SR, s, c, right=after) for c in columns]


def add(out, s, sound):
    """Lay a short sound into the output at second s."""
    i = max(round(s * SR), 0)
    out[i:i + len(sound)] += sound[:N - i]


def from_db(db):
    """Decibels to amplitude."""
    return 10 ** (np.asarray(db) / 20)


def rms_one(x):
    """Scale a signal to rms 1."""
    return x / np.sqrt(np.mean(x ** 2) + 1e-20)


def scene():
    """Everything reaches the one microphone, which feeds both channels."""
    bank = swish() + bail() + reel()
    surface = water() + spatter() + slaps() + wash() + ticks()
    return np.tile(bank + surface + hush(), (2, 1))


def record(dry):
    """A steep low-pass cuts the top."""
    return signal.sosfilt(signal.cheby2(12, 60, CUTOFF_HZ, fs=SR, output="sos"), dry)


dry = scene()
out = record(dry)
int16_out(out)
```